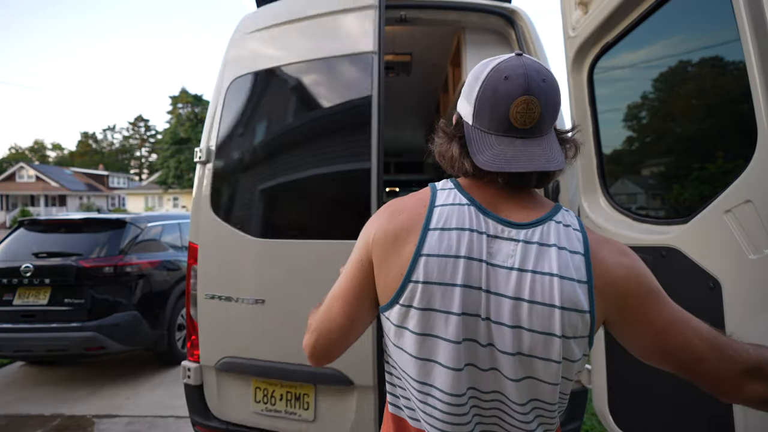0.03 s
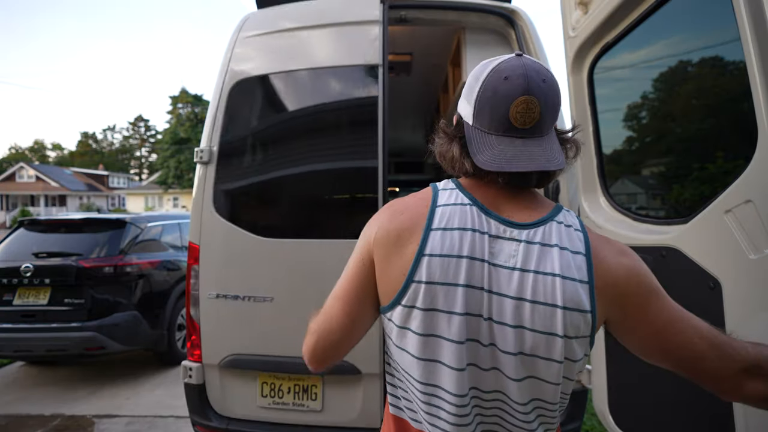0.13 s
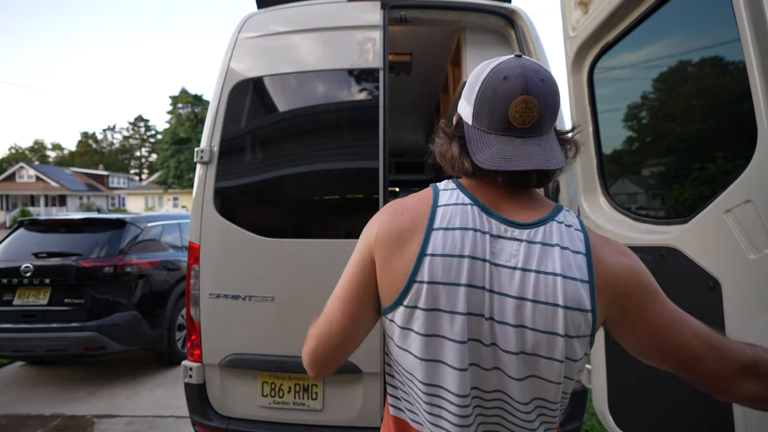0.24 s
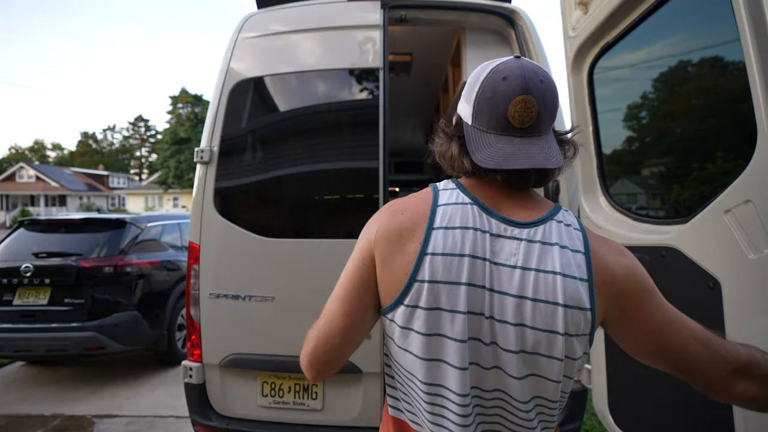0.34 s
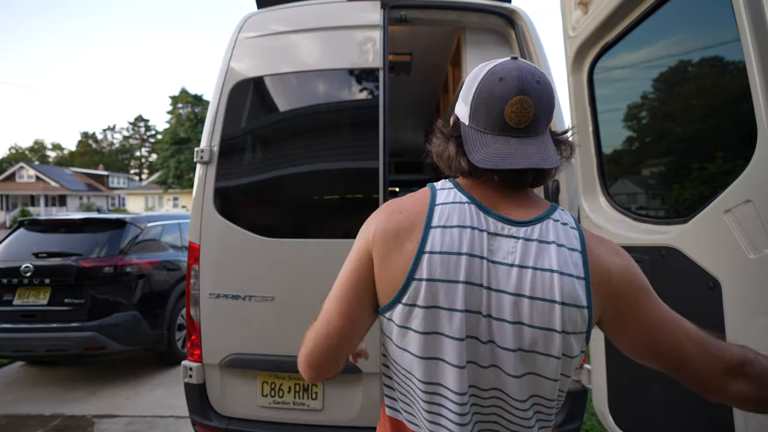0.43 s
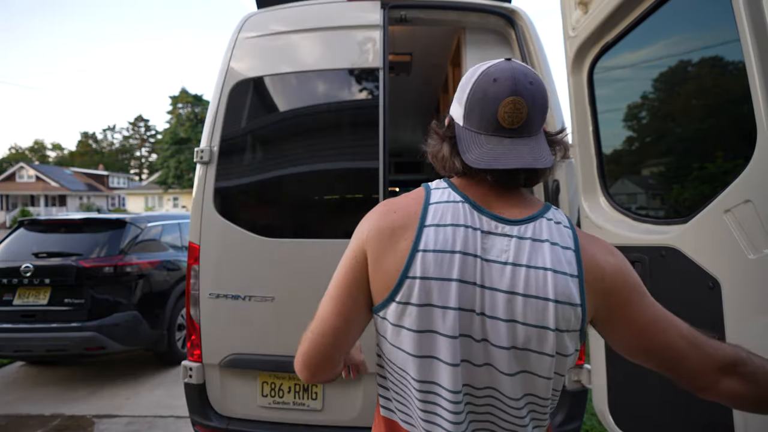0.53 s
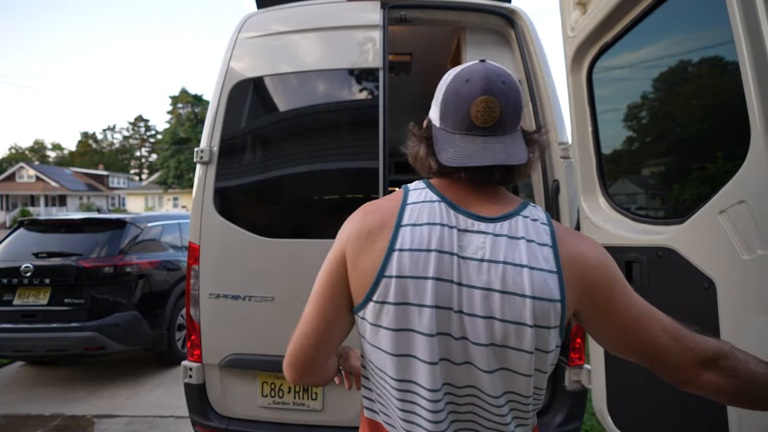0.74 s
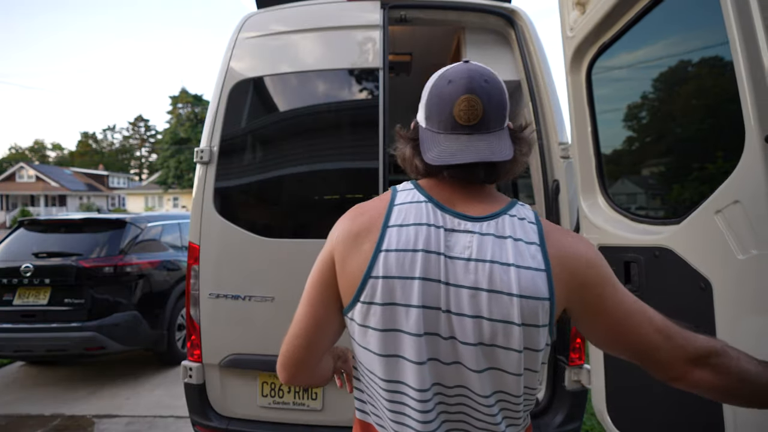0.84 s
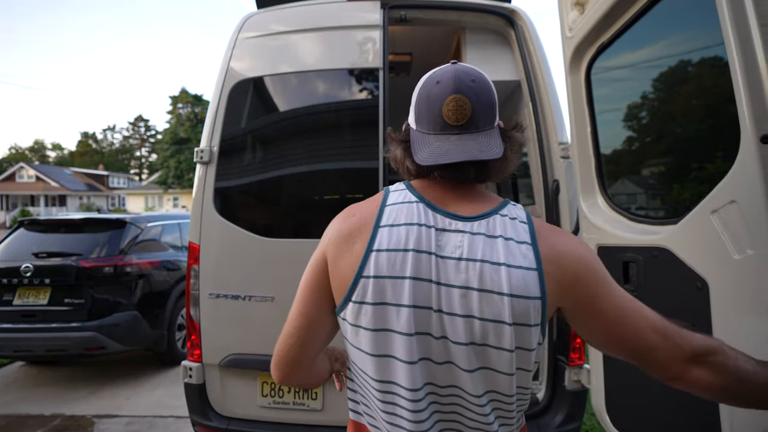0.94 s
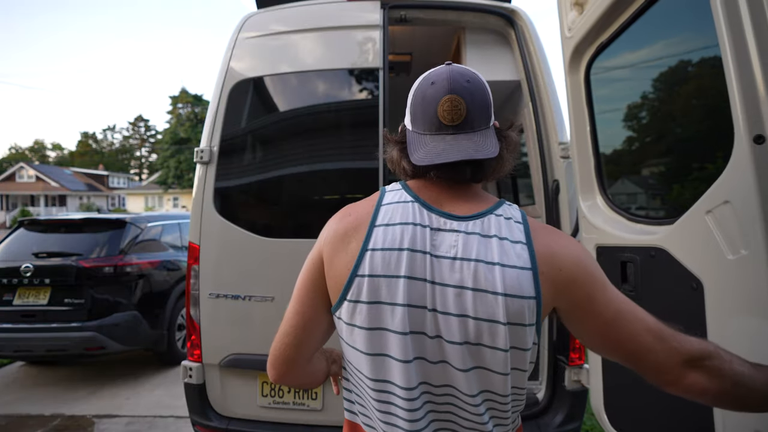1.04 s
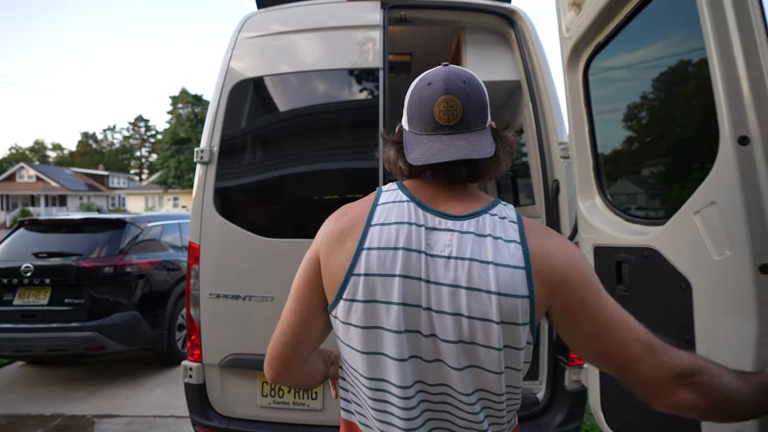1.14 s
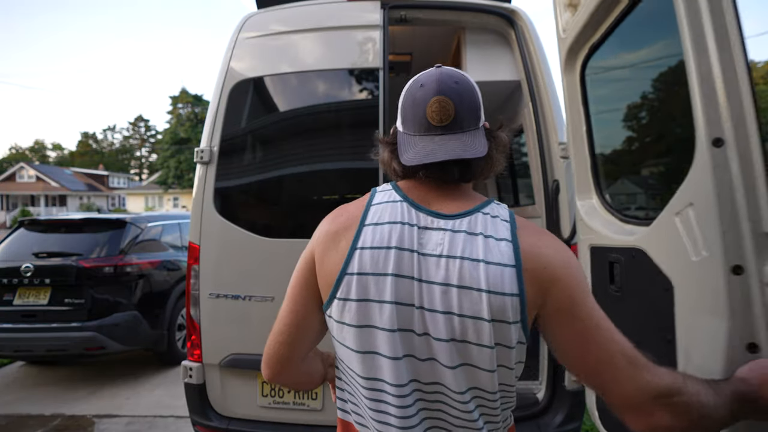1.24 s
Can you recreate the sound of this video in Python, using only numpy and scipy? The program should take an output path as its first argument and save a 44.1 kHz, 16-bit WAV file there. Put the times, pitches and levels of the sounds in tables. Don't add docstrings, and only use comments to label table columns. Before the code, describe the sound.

One loud van door slam, heard from a few steps away in a residential driveway; latch clack and dense metallic clatter last under half a second, flattened by limiting, then faint ticks and soft traffic wash.

```python
import sys
import numpy as np
from scipy import signal
from scipy.io import wavfile
from scipy.ndimage import uniform_filter1d, minimum_filter1d

SR = 44100
rng = np.random.default_rng(int(sys.argv[2]) if len(sys.argv) > 2 else 0)


def int16_out(signal):
    q = np.round(np.clip(np.atleast_2d(signal).T, -1, 1) * 32767)
    wavfile.write(sys.argv[1], SR, q.astype(np.int16))


def elevation(decibels):
    levels = np.asarray(decibels, float)
    return 10 ** (levels / 20)


N = 57330

# (time [s], strength [dB], contact time [ms])
FRAME_KNOCKS = [(0.2228, 0, 0.18), (.2255, -0.5, 0.31), (.232, -10, 0.278), (0.2437, -0.5, 0.21),
                (.2485, -3.5, 0.32), (.257, -1, 0.47), (.271, -1, 0.1865), (0.2794, -3, 0.57),
                (.286, -7, 0.49), (.302, -5, 0.4), (.3195, 4, 0.376), (0.332, -10, 0.72), (.36, -11, 0.58),
                (.366, -4, 0.23), (.373, -6.5, 0.76), (.384, -7, 0.97), (.391, -0.5, 1.32),
                (0.416, -32, 0.4), (0.426, -10.5, 0.89), (.439, -19, 1.4), (.468, -19, 1.8),
                (.525, -28, 0.78), (.55, -20, 2.8)]
# (frequency [Hz], level [dB], decay time T60 [s])
SKIN_MODES = [(320, -10.5, 0.045), (414, -6.5, 0.047), (539, -2.5, 0.075), (622.5, -8, 0.073),
              (815, -5.5, 0.072), (926, -9, 0.064), (946, -6, 0.089), (1094.4, -6.5, 0.11),
              (1290, 3.5, 0.036), (1440, -5.5, 0.085), (1625, -6, 0.035), (1935, -2, 0.041),
              (2510, -4, .02), (3120, -13, 0.031)]
# (time [s], level [dB], frequency [Hz], decay length per 20 dB [s])
LATCH_TICKS = [(.2235, -5.5, 1800, 0.0073), (0.2242, -9.5, 3260, 0.01), (.2245, -18, 4570, .007),
               (.2245, -31, 12000, .005), (.238, -22, 3930, 0.004), (.249, -27.5, 7500, 0.0092),
               (.27, -24, 6370, .016), (.271, -8.5, 1530, 0.0088), (.272, -22, 2970, 0.012),
               (.316, -28.5, 7500, 0.015), (0.318, -3.5, 1230, 0.0066), (.365, -16, 1160, 0.011),
               (.374, -21, 1700, 0.012), (.425, -27.5, 2380, 0.015), (0.485, -47, 7000, .01),
               (0.533, -45, 6360, .012), (0.57, -60, 6370, 0.018), (.687, -51, 7750, 0.003),
               (.716, -53, 8360, .005), (1.16, -60, 10000, .004)]
# (time [s], effort [dB])
RATTLE_EFFORT = [
    (0.2229, -39),
    (0.2263, -21.5),
    (.243, -15.5),
    (.26, -20),
    (.31, -19.5),
    (.335, -23),
    (.44, -39.5),
    (.46, -43.5),
    (.59, -51),
]
# (time [s], effort [dB])
SHUDDER_EFFORT = [
    (0.226, -43),
    (.26, -19.5),
    (.3, -16.5),
    (.39, -21.5),
    (.41, -26.5),
    (.44, -27.5),
    (.455, -33),
    (.55, -36.5),
    (.59, -40),
]
# (frequency [Hz], density [dB per Hz])
RATTLE_COLOUR = [(150, -29), (380, -7.5), (1300, -5.5), (2750, -10), (7400, -17.5), (8800, -22.5),
                 (10200, -31), (16000, -34.5)]
# (frequency [Hz], density [dB per Hz])
BODY_COLOUR = [(35, -13), (150, 0.5), (260, -4), (900, -9), (2400, -23), (7800, -28.5), (9500, -46.5),
               (16000, -54)]
# (start [s], frequency [Hz], level [dB], swell [s], decay time T60 [s])
PANEL_BOOMS = [(.222, 430, -11.5, .008, .05), (.224, 850, -14.5, .006, .04), (.236, 640, -18, .007, .04),
               (.252, 430, -14, .008, .05), (.296, 277, -11.5, .022, .09), (.364, 147, -18, .014, .07),
               (.275, 190, -19, .012, .08), (.29, 140, -20, .012, .1), (.345, 195, -20, .012, .08),
               (.362, 420, -17, .012, .06), (.46, 260, -28, .007, .04), (.515, 165, -32, .008, .07),
               (.543, 150, -33, .006, .05), (.25, 103, -27, .04, .6), (.25, 60, -33, .05, .5),
               (.45, 120, -38, .02, .3)]
# (frequency [Hz], density [dB per Hz])
STREET_COLOUR = [(25, -14.5), (110, -3.5), (300, -2.5), (1000, -5), (2600, -16), (7600, -28), (9800, -37.5),
                 (16000, -43.5)]

SKIN_DB, THUD_DB, THUD_T60_S = -13.0, -1.0, 0.012
KNOCK_LOW_CUT_HZ = 126
RATTLES_PER_S, RATTLE_SPREAD_DB, RATTLE_SHARE, DIE_DB_PER_S = 3300, 2.5, 0.3, 300
SEAL_S, SEAL_LENGTH_S, SEAL_DB, SEAL_HZ = 0.194, 0.048, -42, 462
YARD_DB, YARD_T60_S, YARD_HZ = -12.5, 0.38, 5000
STREET_DB, STREET_RISE_DB_PER_S, PATCHY_DB = -40.5, 1, 0.73
CEILING_DB, RECOVER_DB_PER_S = -1.5, 600
EDGE_HZ = 15770


def evened(x):
    return x / np.sqrt(np.mean(x ** 2) + 1e-20)


def add(mix, s, sound):
    part = mix[round(s * SR):][:len(sound)]
    part += sound[:len(part)]


def coloured(x, points):
    hz = abs(np.fft.fftfreq(4096, 1 / SR))
    f, db = np.transpose(points)
    log_gain = np.interp(np.log(hz + 1), np.log(f), db) * np.log(10) / 20
    response = np.exp(np.conj(signal.hilbert(log_gain)))
    taps = np.fft.ifft(response).real[:2048]
    return signal.oaconvolve(x, taps / np.linalg.norm(taps))[:len(x)]


def band(x, hz, spread):
    edges = np.clip([hz / spread, hz * spread], 20, 0.45 * SR)
    return signal.sosfilt(signal.butter(2, edges, "band", fs=SR, output="sos"), x)


def knocks():
    out, t = np.zeros(N), np.arange(6000) / SR
    mixes = rng.standard_normal((len(FRAME_KNOCKS), len(SKIN_MODES), 2))
    for (s, db, contact_ms), mix in zip(FRAME_KNOCKS, mixes):
        u = t[:600] / (contact_ms / 4000)
        push = u * np.exp(-u)
        ring = 0
        for (hz, mode_db, t60), (level_shift, detune) in zip(SKIN_MODES, mix):
            decay = elevation(mode_db + 3.0 * level_shift - 60 * t / t60)
            ring = ring + decay * np.sin(2 * np.pi * hz * (1 + 0.021 * detune) * t)
        thud_hz = 300 / contact_ms
        thud = elevation(THUD_DB - 60 * t / THUD_T60_S) * np.sin(2 * np.pi * thud_hz * t) * np.sign(mix[0, 0])
        blow = np.convolve(thud + elevation(SKIN_DB) * ring, push / push.sum())[:len(t)]
        add(out, s, elevation(db) * blow)
    return signal.lfilter(*signal.butter(2, KNOCK_LOW_CUT_HZ, "high", fs=SR), out)


def ticks():
    out, t = np.zeros(N), np.arange(1500) / SR
    noises = rng.standard_normal((len(LATCH_TICKS), len(t)))
    for (s, db, hz, length), noise in zip(LATCH_TICKS, noises):
        onset = np.minimum(t / 0.00063, 1)
        add(out, s, evened(band(noise, hz, 1.35)) * onset * elevation(db - 20 * t / length))
    return out


def driven(drive, effort, colour):
    t = np.arange(N) / SR
    db = np.interp(t, *np.transpose(effort), left=-120)
    db = db - DIE_DB_PER_S * np.maximum(t - effort[-1][0], 0)
    return coloured(drive * elevation(db), colour)


def shudder():
    sizes = elevation(RATTLE_SPREAD_DB * np.minimum(rng.exponential(1, N), 4)) * rng.choice([-1., 1.], N)
    clicks = evened(sizes * (rng.random(N) < RATTLES_PER_S / SR))
    drive = np.sqrt(RATTLE_SHARE) * clicks + np.sqrt(1 - RATTLE_SHARE) * rng.standard_normal(N)
    rattle = driven(drive, RATTLE_EFFORT, RATTLE_COLOUR)
    body = driven(rng.standard_normal(N), SHUDDER_EFFORT, BODY_COLOUR)
    return rattle + body


def booms():
    out, t = np.zeros(N), np.arange(SR // 2) / SR
    for s, hz, db, swell, t60 in PANEL_BOOMS:
        rise = np.sin(np.pi / 2 * np.minimum(t / swell, 1)) ** 2
        decay = elevation(db - 60 * np.maximum(t - 2 * swell, 0) / t60)
        add(out, s, rise * decay * np.sin(2 * np.pi * hz * t))
    return out


def seal():
    out, t = np.zeros(N), np.linspace(0, 1, int(SEAL_LENGTH_S * SR))
    air = evened(band(rng.standard_normal(3000), SEAL_HZ, 1.6))[-len(t):]
    add(out, SEAL_S, air * elevation(SEAL_DB + 13.0 * t))
    return out


def yard(x):
    taps = np.zeros(SR // 2)
    at = np.arange(400, len(taps) - 20, 20)
    taps[at + rng.integers(0, 20, len(at))] = rng.choice([-1., 1.], len(at))
    decay = elevation(-60 * np.arange(len(taps)) / SR / YARD_T60_S)
    r = np.exp(-2 * np.pi * YARD_HZ / SR)
    tail = signal.lfilter([1], [1, -r], taps * decay)
    return elevation(YARD_DB) * signal.fftconvolve(x, tail / np.linalg.norm(tail))[:N]


def street():
    hz, t, z = signal.stft(rng.standard_normal(N), SR, nperseg=512)
    patches = uniform_filter1d(rng.standard_normal(z.shape), size=6, axis=0)
    patches = evened(uniform_filter1d(patches, size=10, axis=1))
    level_db = PATCHY_DB * patches + STREET_RISE_DB_PER_S * (t - 1)
    wash = signal.istft(z * elevation(level_db), SR, nperseg=512)[1][:N]
    return elevation(STREET_DB) * evened(coloured(wash, STREET_COLOUR))


def scene():
    door = knocks() + ticks()
    return (door + yard(door) + shudder() + booms() + seal() + street())[None]


def top_cut(x):
    return signal.sosfilt(signal.butter(12, 16520, fs=SR, output="sos"), x)


def record(dry):
    over_db = np.maximum(20 * np.log10(abs(dry[0]) + 1e-9) - CEILING_DB, 0)
    fall = np.arange(N) * RECOVER_DB_PER_S / SR
    held_db = -minimum_filter1d(fall - np.maximum.accumulate(over_db + fall), size=61)
    held = dry / elevation(uniform_filter1d(held_db, size=31))
    edge = signal.firwin(1535, EDGE_HZ, window=("kaiser", 9), fs=SR)
    return top_cut(signal.oaconvolve(held, edge[None], "same"))


dry = scene()
out = record(dry)
int16_out(out)
```